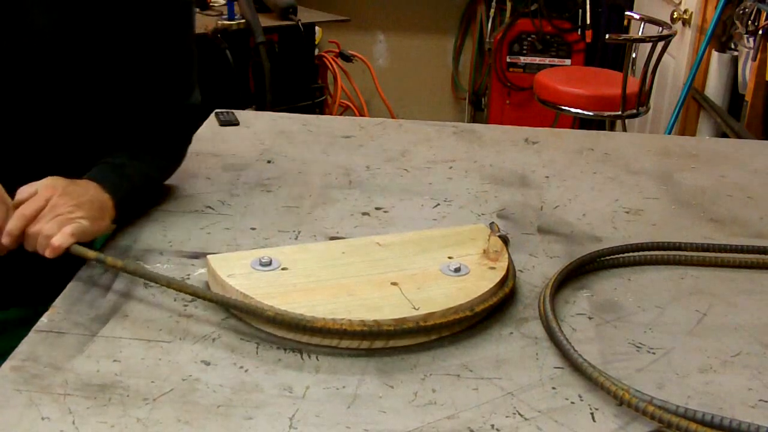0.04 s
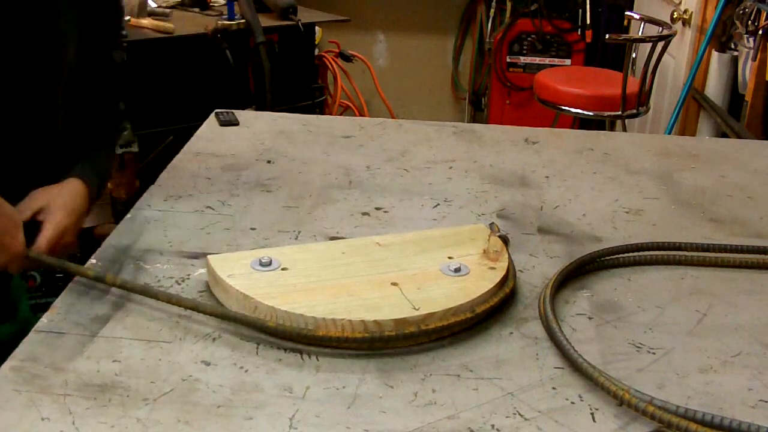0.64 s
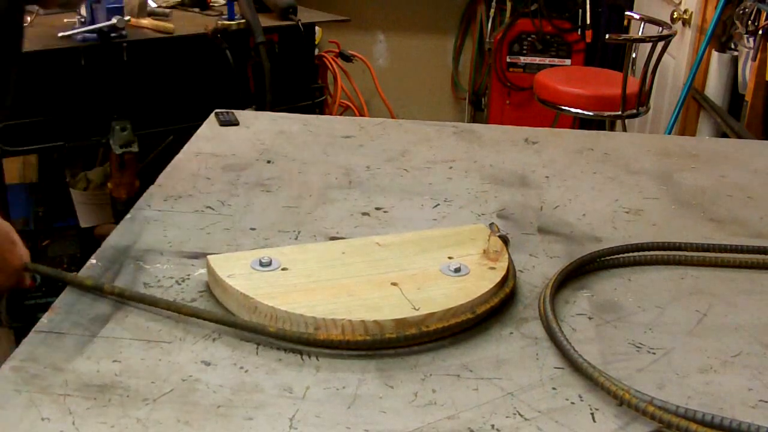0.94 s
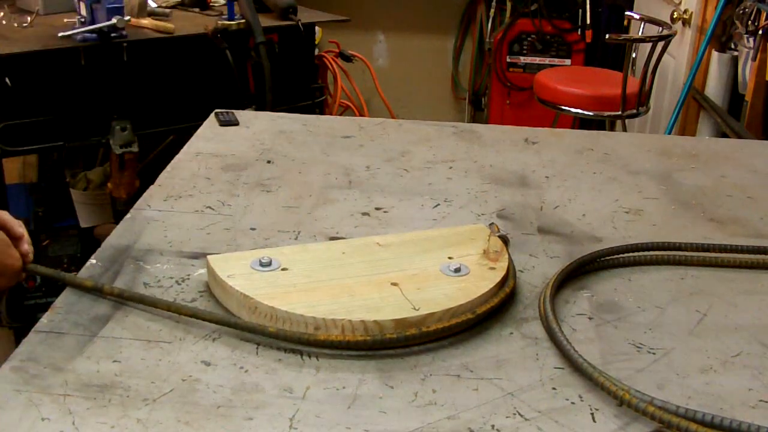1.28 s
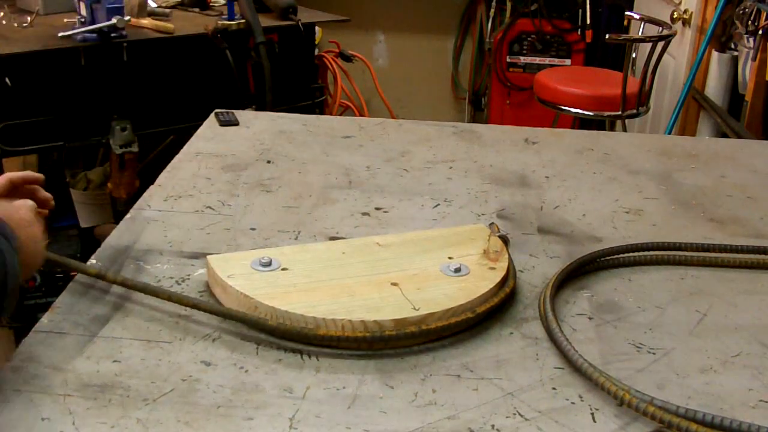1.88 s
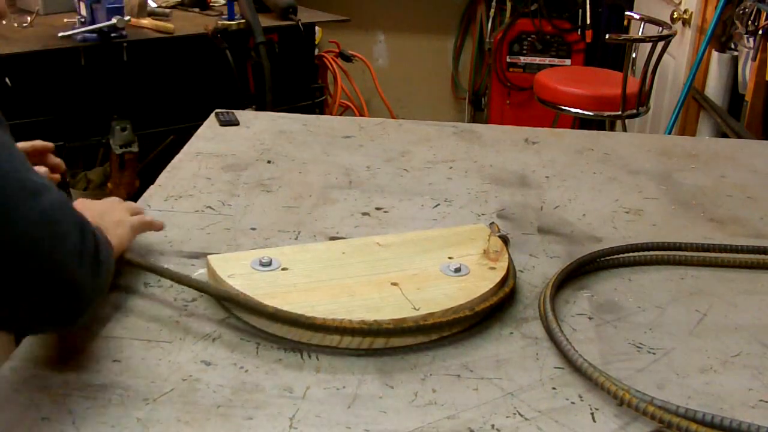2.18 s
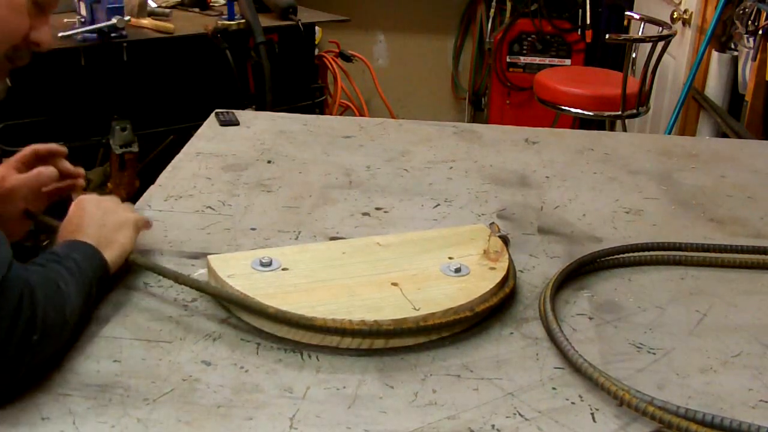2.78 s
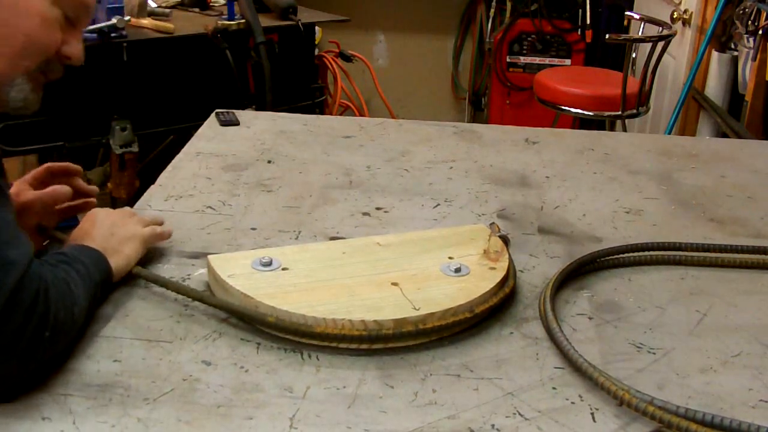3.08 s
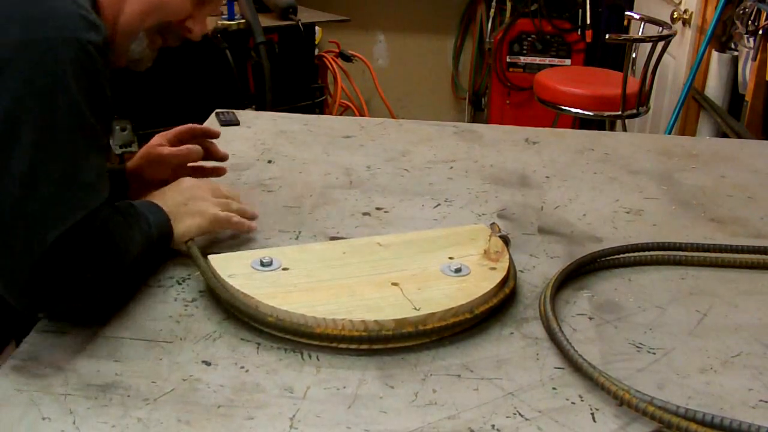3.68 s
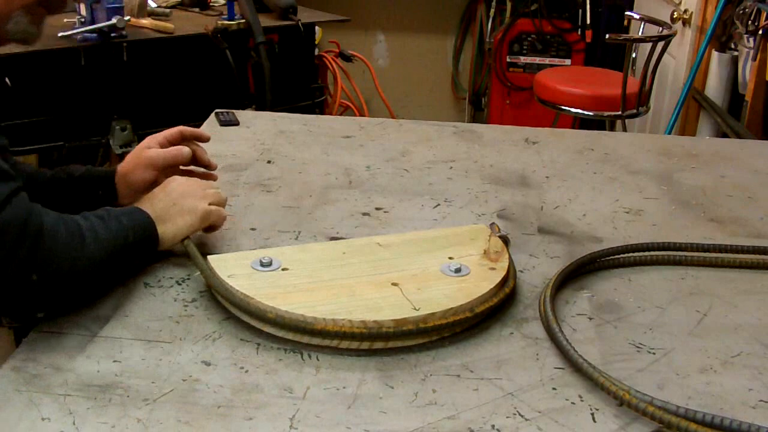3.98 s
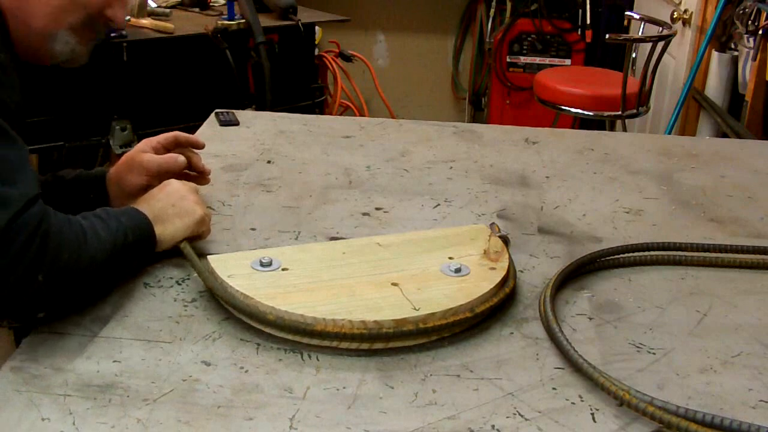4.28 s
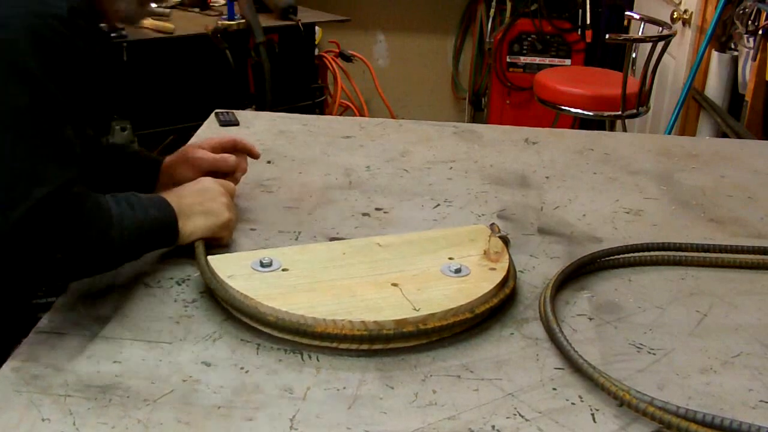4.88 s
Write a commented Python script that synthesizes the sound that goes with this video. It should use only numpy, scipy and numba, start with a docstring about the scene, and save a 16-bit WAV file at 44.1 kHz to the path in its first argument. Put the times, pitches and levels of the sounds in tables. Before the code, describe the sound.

A steel bar knocks on a metal table and clicks around a wooden form, with sleeve swishes in a small workshop.

```python
"""A ribbed steel bar is bent by hand round a wooden form bolted to a steel table in a small workshop.
The bar knocks on the tabletop and its ribs slip over the form in runs of clicks; each contact cracks,
rings the table and fills the room. The bar also scrapes along the table and makes the wood creak.
Between pulls the worker's sleeves swish, shoes thud on the floor and a hand brushes the tabletop."""
import sys
import numpy as np
from scipy import signal
from scipy.fft import rfft, irfft, next_fast_len
from scipy.io import wavfile
from scipy.ndimage import uniform_filter1d
from numba import njit

SR = 44100
rng = np.random.default_rng(int(sys.argv[2]) if len(sys.argv) > 2 else 0)


def master(y):
    """Save y as 16-bit WAV."""
    cut = np.clip(np.atleast_2d(y).T, -1, 1)
    pcm = np.round(cut * 32767)  # scale
    wavfile.write(sys.argv[1], SR, pcm.astype(np.int16))


N = 222175
T = np.arange(N) / SR


def undb(db):
    """Turn decibels into a gain."""
    return 10 ** (np.asarray(db) / 20)


def unit(x):
    """Scale a sound to an average (rms) level of 1."""
    return x / np.sqrt(np.mean(x ** 2))


def at(points, hz):
    """Read between (Hz, value) points on a log-frequency axis."""
    point_hz, value = np.transpose(points)
    return np.interp(np.log(hz + 1), np.log(point_hz), value)


def colour(x, points):
    """Turn a sound's frequencies up or down along (Hz, dB) points."""
    size = next_fast_len(x.shape[-1] + 2048)
    gain = undb(at(points, np.fft.rfftfreq(size, 1 / SR)))
    return irfft(rfft(x, size) * gain, size)[..., :x.shape[-1]]


def fade(t, t60):
    """Die away smoothly; t60 is the fade time, the seconds it takes to drop 60 dB."""
    return np.exp(-np.log(1000) * t / t60)


def add(track, start, sound):
    """Mix a sound into a track at a time in seconds."""
    i = max(int(start * SR), 0)
    track[..., i:i + sound.shape[-1]] += sound[..., :max(N - i, 0)]


def flutter(rate):
    """A smooth random wobble that takes about `rate` new values a second."""
    hold = int(SR / rate)
    steps = np.repeat(rng.standard_normal(N // hold + 1), hold)
    return unit(uniform_filter1d(steps, hold)[:N])


def gesture(start, length, swell_s, t60):
    """The loudness of one sliding movement: it swells, holds until its length is up, then dies away."""
    rise = np.sin(np.pi / 2 * np.clip((T - start) / swell_s, 0, 1)) ** 2
    return rise * fade(np.clip(T - start - length, 0, 2 * t60), t60)


@njit
def high_pass(x, edge, damping):
    """Cut the lows below a moving edge; less damping gives a stronger peak at the edge."""
    y, band, low = np.empty(len(x)), 0., 0.
    for i in range(len(x)):
        g = edge[i]
        v = (band + g * (x[i] - low)) / (1 + g * (g + damping))
        y[i] = x[i] - damping * v - low - g * v
        band, low = 2 * v - band, low + 2 * g * v
    return y


def diffuse(points, size=N):
    """Coloured noise from all sides: left and right are alike in the bass, unlike in the treble."""
    # Each row: frequency in Hz, how alike left and right are (1 is the same, 0 unrelated).
    likeness_curve = [(100, .98), (700, .94), (1900, .78), (4200, .38), (7500, .12), (12000, -.2)]
    padded = next_fast_len(size)
    hz = np.fft.rfftfreq(padded, 1 / SR)
    likeness = np.clip(at(likeness_curve, hz), -.99, .99)
    mid, side = rfft(rng.standard_normal((2, padded))) * np.sqrt([1 + likeness, 1 - likeness])
    spectrum = np.array([mid + side, mid - side]) * undb(at(points, hz))
    return unit(irfft(spectrum, padded)[:, :size])


def room_air(db=-65):
    """The quiet, steady hush of the room."""
    # The tone of the hush. Each row: frequency in Hz, level in dB.
    air_colour = [(25, -2), (60, -11), (120, -0.5), (250, -2.5), (600, 4), (1500, 2), (4000, -6.5),
                  (15000, -11)]
    return undb(db) * diffuse(air_colour)


def room_echo(sound, t60=0.89, build_s=0.0021, wet_db=-2, wall_s=0.017, wall_db=-12):
    """Near surfaces answer in a quick burst, one wall with a distinct echo; the rest dies away slowly."""
    # The tone of the echoes. Each row: frequency in Hz, level in dB.
    echo_colour = [(60, 0.5), (280, 0), (480, 1), (800, 0), (1150, 0.5), (1700, -0.5), (2600, -3),
                   (4200, -8), (7000, -4), (10500, -9.5), (15000, -7)]
    t = T[:SR]
    burst = undb(-4) * fade(t, 0.16)
    envelope = (fade(t, t60) + burst) * (1 - np.exp(-t / build_s))
    tail = unit(diffuse(echo_colour, size=SR) * envelope) / np.sqrt(SR)
    out = signal.fftconvolve(sound[None], undb(wet_db) * tail, axes=1)[:, :N]
    wall = colour(sound, [(600, -6), (1800, -24), (4000, -18), (12000, -20)])
    add(out, wall_s, undb(wall_db) * wall)
    return out


def sleeves(grain_db=0.3, edge_hz=1347, edge_hz_per_db=3.5, edge_q=2.17, coarse_db=2):
    """Cloth slides on cloth and table: a fine swish over a coarser rub, both catching unevenly."""
    # Arm movements. Each row: start, swell time and length in seconds, swish level in dB,
    # rub offset from that level in dB.
    strokes = [(.01, 0.051, .075, -51, -1), (0.173, 0.076, 0.15, -48.5, -7.5),
               (0.551, 0.021, 0.077, -56, -7.5), (0.609, 0.063, 0.11, -50.5, -5.5),
               (0.751, 0.027, 0.041, -52.5, -3), (.86, .03, .07, -58.5, -3.5),
               (0.942, 0.075, .11, -42, -5.5), (1.062, 0.057, 0.13, -41.5, -3), (1.328, 0.011, .03, -54, 7),
               (1.343, 0.049, 0.083, -39, -12), (1.454, 0.043, 0.15, -45, -6),
               (1.85, 0.025, 0.068, -47.5, 1), (2.073, .02, 0.042, -51, -1.5),
               (2.188, 0.047, 0.057, -49.5, -1), (2.417, 0.028, 0.081, -37, -3.5),
               (2.788, .05, 0.062, -52, -1.5), (2.925, 0.022, 0.072, -53.5, -2),
               (3.187, 0.055, 0.098, -54, -5), (3.368, .07, 0.14, -53, -10), (3.563, 0.06, 0.13, -64, -12),
               (3.715, 0.013, 0.051, -47, -10), (3.742, 0.053, 0.089, -38, -4.5),
               (3.99, .03, 0.11, -51.5, -4.5), (4.07, 0.095, 0.11, -40, -3), (4.58, .05, 0.051, -49.5, 4),
               (4.692, 0.054, 0.066, -51, -9), (4.873, 0.056, 0.077, -35, -8), (4.985, 0.044, .06, -44, 3)]
    # The tones of the swish and the rub. Each row: frequency in Hz, level in dB.
    swish_colour = [(2500, -30), (5000, -4.5), (7500, -1), (9500, -6), (13000, -6), (16000, -10.5)]
    rub_colour = [(100, 0), (450, 6), (850, -5), (1300, -8), (1900, -2.5), (2700, -1), (4200, 0),
                  (6000, -18), (12000, -50)]
    swish_gain, rub_gain = undb(-61), undb(-64)  # the cloth never quite rests
    for start, swell, length, db, rub_db in strokes:
        swish_gain = np.hypot(swish_gain, undb(db) * gesture(start, length, swell, t60=0.52))
        rub_gain = np.hypot(rub_gain, undb(db + rub_db) * gesture(start, length, swell, t60=0.66))
    # A stronger stroke lifts the lower edge of the rub.
    vigour_db = 20 * np.log10(swish_gain / np.median(swish_gain))
    edge = np.tan(np.pi * (edge_hz + edge_hz_per_db * vigour_db) / SR)
    rub = np.array([high_pass(side, edge, 1 / edge_q) for side in diffuse(rub_colour)])
    cloth = swish_gain * diffuse(swish_colour) + rub_gain * undb(coarse_db) * unit(rub)
    return cloth * undb(grain_db * flutter(180))


def hand_brush(start=3.762, db=-32, rise_s=0.0017, t60=0.26, hz=8200, width_hz=2200, lag_s=.00005):
    """A hand brushes the tabletop with a bright hiss; its highest part reaches the left a little later."""
    out, t = np.zeros((2, N)), T[:SR // 2]
    peak = signal.iirpeak(hz, hz / width_hz, fs=SR)
    near, *scattered = rng.standard_normal((3, len(t)))
    hiss = unit(signal.lfilter(*peak, signal.lfilter(*peak, near + np.array(scattered))))
    top = colour(rng.standard_normal(len(t)), [(8500, -38), (10500, 3), (15000, 2)])
    hiss += np.array([np.interp(t - lag_s, t, top), top])
    add(out, start, undb(db) * hiss * (1 - np.exp(-t / rise_s)) * fade(t, t60))
    return out


def thuds(rise_s=0.0043):
    """Shoes, body and bar make soft, heavy contacts: low rumbles with no crack."""
    # Each row: start in seconds, level in dB, treble cutoff in Hz, fade time in seconds.
    contacts = [(.442, -55, 1310, .33), (.865, -62, 700, .15), (.927, -58, 796, .46),
                (1.02, -50.5, 1290, .25), (1.161, -72, 152, .8), (1.301, -69, 150, .7),
                (1.799, -51, 302, 0.61), (2.110, -44.5, 700, 0.47), (2.181, -47.5, 1100, 0.51),
                (2.331, -53, 204, 0.2), (2.376, -35, 540, 0.68), (2.941, -50.5, 910, 0.82),
                (3.05, -63, 150, 0.56), (4.15, -54, 614, 0.29), (4.989, -46.5, 500, .22)]
    # The tone of a thud before its treble is cut. Each row: frequency in Hz, level in dB.
    thud_colour = [(30, -20), (55, -47), (75, 4), (95, -25), (121, 8.5), (150, -4.5), (200, 2.5),
                   (450, 7.5), (2000, 20.5)]
    out, t = np.zeros((2, N)), T[:SR]
    for start, db, dull_hz, t60 in contacts:
        low_pass = signal.butter(3, dull_hz, fs=SR, output="sos")
        rumble = unit(signal.sosfilt(low_pass, diffuse(thud_colour, size=SR)))
        envelope = (1 - np.exp(-t / rise_s)) * (fade(t, t60) + undb(-14.5) * fade(t, 1.0))
        add(out, start, undb(db) * rumble * envelope)
    return out


def creaks_and_bar_note(waver=0.11, overtone_db=-3, fall_db=-12):
    """Short, dull, wavering tones: the wood creaks, and the bar sounds a low note when knocked at 1.524 s."""
    # Each row: start and length in seconds, pitch in Hz, level in dB.
    short_tones = [(0.447, 0.069, 565, -64.5), (1.028, 0.037, 870, -53.5), (1.524, 0.024, 411, -47.5),
                   (2.109, 0.012, 577, -47.5), (2.17, 0.0355, 492.7, -47.5), (4.517, 0.014, 459, -44)]
    out, t = np.zeros(N), T[:SR // 5]
    for start, length, hz, db in short_tones:
        pitch = hz * (1 + waver * flutter(400)[:len(t)])
        angle = 2 * np.pi * np.cumsum(pitch) / SR
        overtones = np.sin(2 * angle) + undb(fall_db) * np.sin(3 * angle)
        tone = unit(np.sin(angle) + undb(overtone_db) * overtones)
        add(out, start, undb(db) * tone * fade(np.maximum(t - length, 0), 0.012))
    return out


def contact_crack(force, spread_s=0.000464, cut_hz=280):
    """A push sets off brief resonances; bending waves in the steel carry the treble ahead of the bass."""
    # Each row, one resonance: frequency in Hz, width in Hz, level in dB.
    resonances = [(486, 190, -11.5), (783, 450, 1.5), (1330, 550, -4), (1737, 550, 5), (2210, 124, -3.5),
                  (3910, 330, -3), (6220, 460, -12.5), (7640, 500, -15), (9660, 2200, -13.5)]
    size = next_fast_len(N + 2048)
    # The delay is spread_s at 1 kHz and shorter for higher frequencies.
    lag_cycles = 2 * spread_s * np.sqrt(np.fft.rfftfreq(size, 1 / SR) * 1000)
    force = irfft(rfft(force, size) * np.exp(-2j * np.pi * lag_cycles), size)[:N]
    force = signal.sosfilt(signal.butter(2, cut_hz, "high", fs=SR, output="sos"), force)
    return sum(undb(db) * signal.lfilter(*signal.iirpeak(hz, hz / width, fs=SR), force)
               for hz, width, db in resonances)


def bar_drag(slips_per_s=1100, scatter_db=3):
    """The bar drags over the table: rust and ribs catch and let go in many tiny slips."""
    # Each row: start and length in seconds, level in dB.
    drags = [(0, 0.0042, -40), (2.216, 0.11, -55.5), (2.316, 0.036, -50), (2.94, 0.07, -61),
             (4.553, .115, -47.5), (4.902, 0.11, -46)]
    slips = (rng.random(N) < slips_per_s / SR) * rng.standard_normal(N)
    slips *= undb(scatter_db * rng.standard_normal(N))
    scrape = colour(contact_crack(slips), [(2500, 0.5), (6000, -9.5)])
    envelope = sum(undb(db) * gesture(start, length, swell_s=0.0029, t60=0.18)
                   for start, length, db in drags)
    return unit(scrape) * envelope


def table_ring(patchy_db=2, detune=.002):
    """The steel top rings in many tones; where the bar lands shifts their level and pitch by chance."""
    # Each row, one tone: frequency in Hz, level in dB, fade time in seconds.
    tones = [(322, -9, 0.62), (510, -7, 0.42), (650, -6, 0.25), (711, 2, 0.12), (860, -13.5, 0.81),
             (905, 7.5, 0.083), (1180, -3, 0.28), (1272, 1, 0.54), (1370, -2, 0.54), (1520, 1.5, 0.7),
             (1700, -20, 0.55), (1700, -12, 0.36), (1870, 13, 0.15), (1980, 8, 0.3), (1890, 8.5, .4),
             (2140, -0.5, .45), (2150, -13, 0.26), (2320, -8, 0.28), (2640, -11, 0.27), (2870, -13, 0.5),
             (3590, -1, 0.64), (3980, -4, 0.31)]
    t = T[:SR // 2].astype(np.float32)
    hz, db, t60 = np.float32(tones).T[:, :, None]
    share, shift, phase = np.float32(rng.standard_normal((len(tones), 3))).T[:, :, None]
    angle = 2 * np.pi * (hz * (1 + detune * shift) * t + phase)
    return np.sum(undb(db + patchy_db * share) * fade(t, t60) * np.sin(angle), axis=0)


def rib_clicks(max_ribs=12, jitter=.05, scatter_db=0.5):
    """One click as each rib slips over the form, nearly evenly spaced, growing or fading with the pull."""
    # Each row: start, length and rib-to-rib gap in seconds, then starting level, ending level,
    # bass boost and treble boost in dB.
    runs = [(3.971, 0.023, 0.0094, -19.5, -14.5, -7, -4), (4.5593, 0.037, 0.0083, -17.5, -28, -1.5, 1.5),
            (4.618, .053, .0152, -17.5, -20, -1, -4), (4.904, 0.053, 0.011, -22, -12, -13, -3.5)]
    for start, length, gap, first_db, last_db, bass_db, treble_db in runs:
        for k, (late, strong) in enumerate(rng.standard_normal((max_ribs, 2))):
            if k * gap < length:
                db = first_db + (last_db - first_db) * k * gap / length + scatter_db * strong
                yield start + gap * (k + jitter * late), db, bass_db, treble_db


def blows(rebounds=2, gap_s=.0175, loss_db=0.5):
    """The bar strikes the table or the form, then bounces in weaker, duller rebounds."""
    # Each row: start in seconds, then level, bass boost, treble boost and the first rebound's
    # level against the blow, all in dB.
    strikes = [(0.1137, -12, -4, -2.5, -29), (1.524, -14, -5.5, 2.5, -19), (1.593, -21.5, -5, -1, -20),
               (1.872, -31.5, -9, -7, -11), (2.348, -35, 10, 16, -20), (2.3738, -9, 0, 5.5, -8),
               (2.444, -12.5, -27, 0.5, -24), (2.672, -43, -10, 16.5, -13), (2.7216, -21, 2.5, 6.5, -24),
               (2.997, -42.5, -4, 14.5, -15), (3.1251, -17, 0.5, 8.5, -21), (3.2395, -13.5, -4.5, 4, -5.5),
               (3.396, -34.5, 11.5, -8, -13.5), (3.718, -44.5, -7, 15, -18), (4.9975, -13.5, -1, -1.5, -18),
               (5.027, -12.5, -4, -1, -14)]
    for start, db, bass_db, treble_db, rebound_db in strikes:
        yield start, db, bass_db, treble_db
        for k in range(rebounds):
            yield start + (k + 1) * gap_s, db + rebound_db - k * loss_db, bass_db + 4, treble_db - 10


def bar_knocks(chatter_db=-19.5, chatter_t60=0.033, build_s=0.0038, crack_db=11.5, ring_db=-48):
    """Each contact is one sharp push and a brief chatter of steel on steel; the table rings on."""
    force, ring, t = np.zeros(N), np.zeros(N), T[:SR // 10]
    chatter_gain = undb(chatter_db) * fade(t, chatter_t60) * (1 - fade(t, build_s))
    for start, db, bass_db, treble_db in [*blows(), *rib_clicks()]:
        push = chatter_gain * rng.standard_normal(len(t))
        push[0] = 1  # the sharp push, ahead of the chatter
        bass = signal.lfilter(*signal.butter(1, 700, fs=SR), push)
        treble = signal.lfilter(*signal.butter(1, 4000, "high", fs=SR), push)
        push += (undb(bass_db) - 1) * bass + (undb(treble_db) - 1) * treble
        add(force, start, undb(db) * push)
        add(ring, start, undb(db) * table_ring())
    return undb(crack_db) * contact_crack(force) + undb(ring_db) * ring


def scene(tones_echo_db=-4):
    """Mix bar, table, room and worker; the steel's treble differs between left and right."""
    steel, tones = bar_knocks() + bar_drag(), creaks_and_bar_note()
    left = colour(steel, [(2500, 2.8), (4500, 1.0), (7000, 0.43), (11500, 2.1)])
    right = colour(steel, [(2500, 2.5), (4500, -1.0), (7000, 2), (11500, -7.5)])
    echo = room_echo(steel + undb(tones_echo_db) * tones)
    return np.array([left, right]) + tones + echo + thuds() + sleeves() + hand_brush() + room_air()


def record(dry, top_hz=15400):
    """Left and right get slightly different tones, and the highest treble is cut steeply."""
    # Each row: frequency in Hz, left gain minus right gain in dB.
    balance = [(100, 0.1), (1800, 1), (4000, 0.4), (6300, -1.5), (8500, -1.5), (10500, 7.5), (13000, -1)]
    left = colour(dry[0], [(hz, db / 2) for hz, db in balance])
    right = colour(dry[1], [(hz, -db / 2) for hz, db in balance])
    low_pass = signal.ellip(10, .2, 70, top_hz, fs=SR, output="sos")
    return signal.sosfilt(low_pass, np.array([left, right]))


dry = scene()
out = record(dry)
master(out)
```